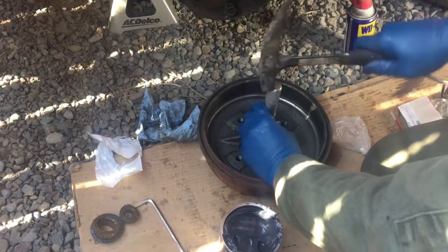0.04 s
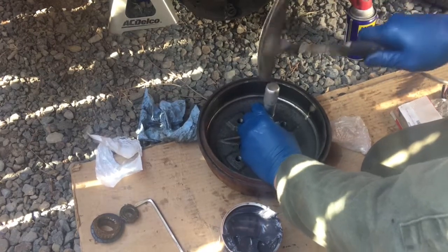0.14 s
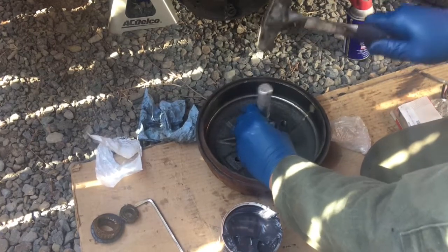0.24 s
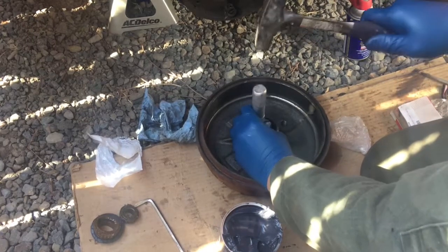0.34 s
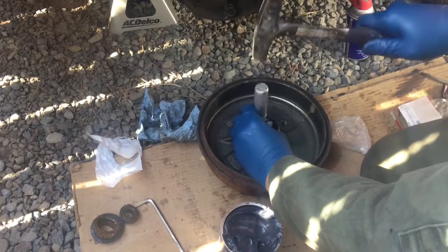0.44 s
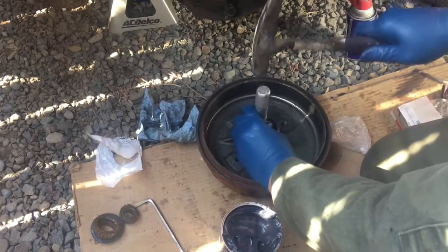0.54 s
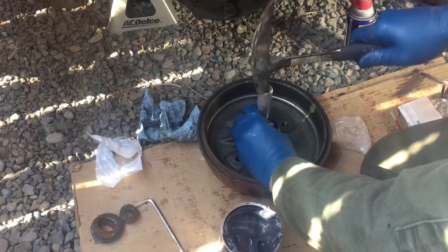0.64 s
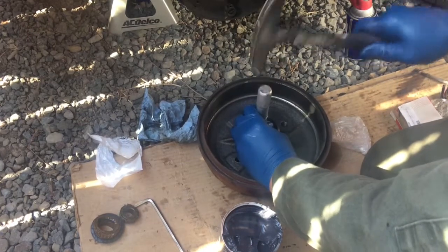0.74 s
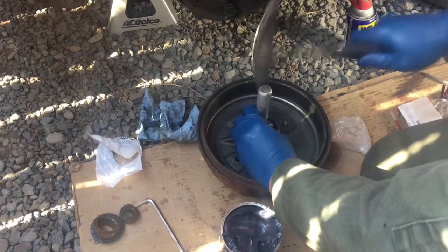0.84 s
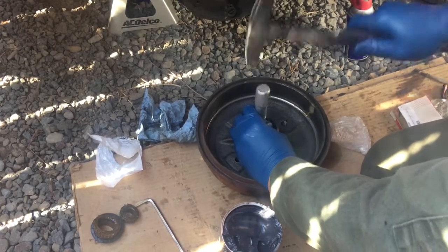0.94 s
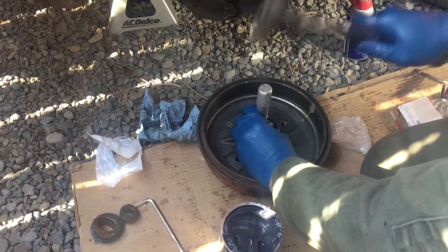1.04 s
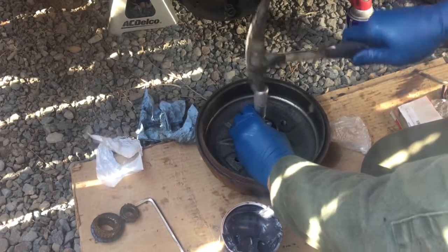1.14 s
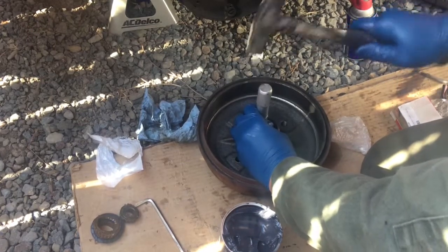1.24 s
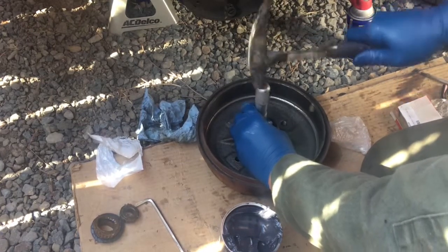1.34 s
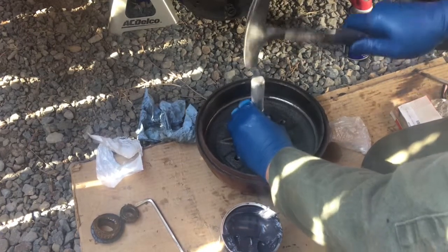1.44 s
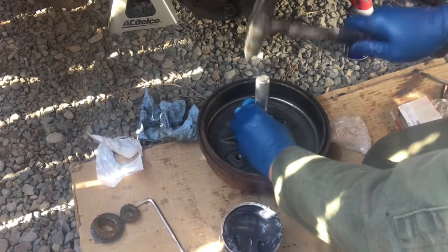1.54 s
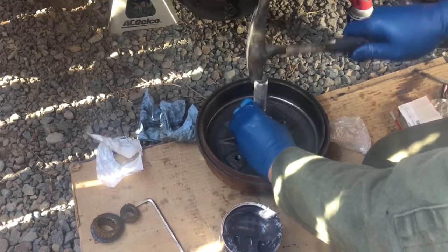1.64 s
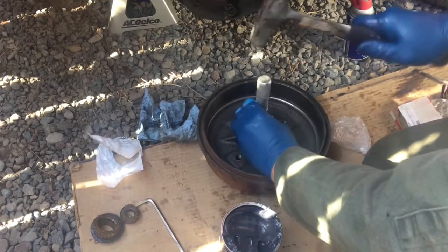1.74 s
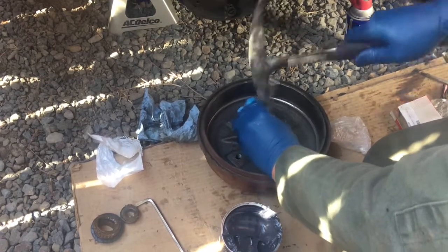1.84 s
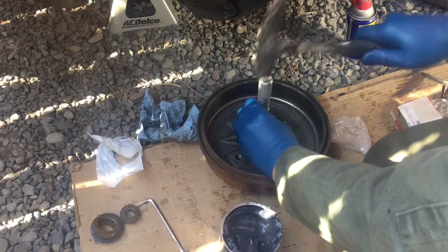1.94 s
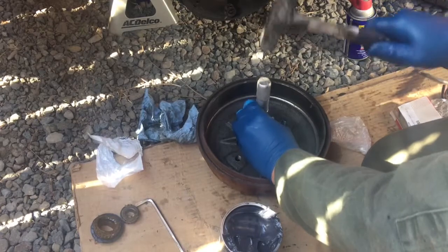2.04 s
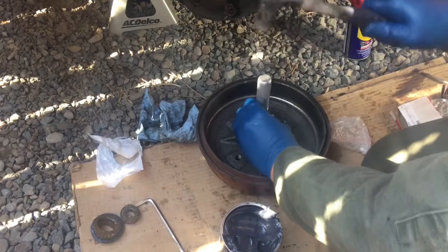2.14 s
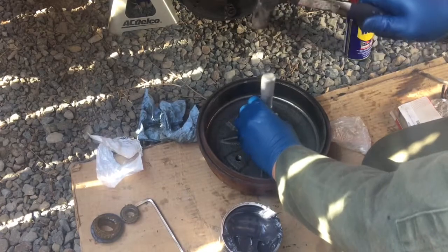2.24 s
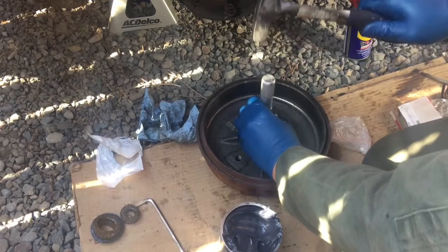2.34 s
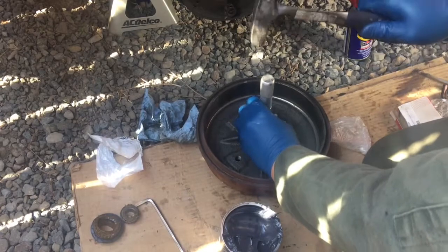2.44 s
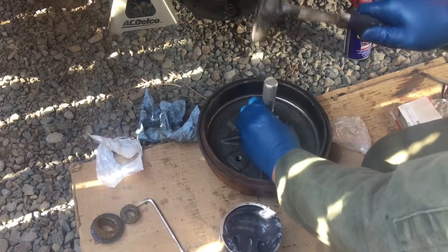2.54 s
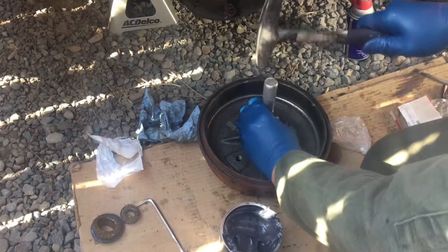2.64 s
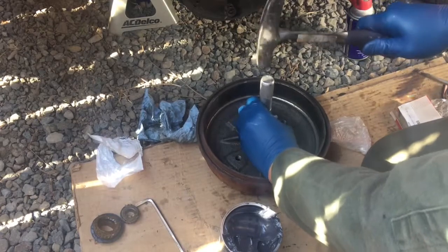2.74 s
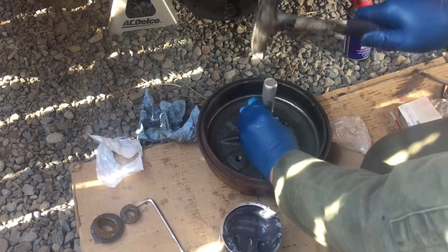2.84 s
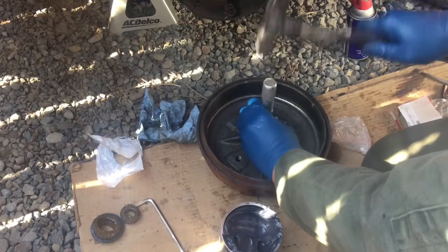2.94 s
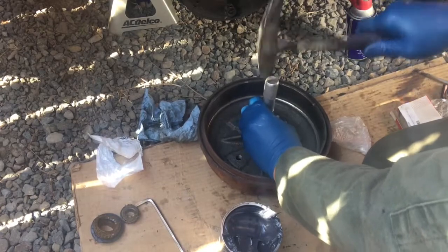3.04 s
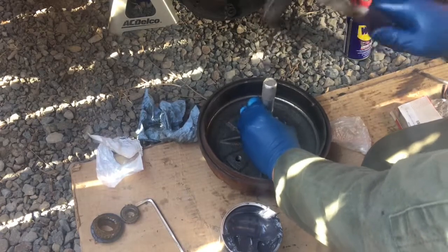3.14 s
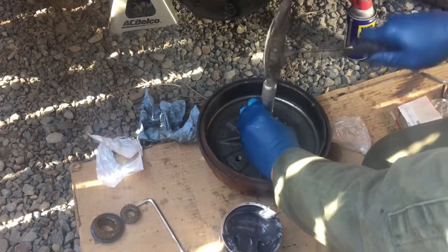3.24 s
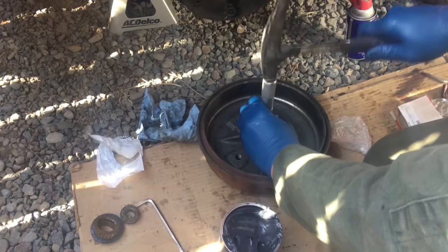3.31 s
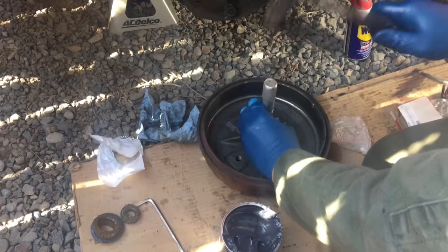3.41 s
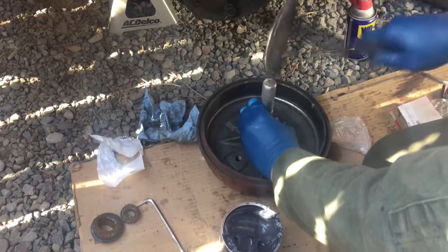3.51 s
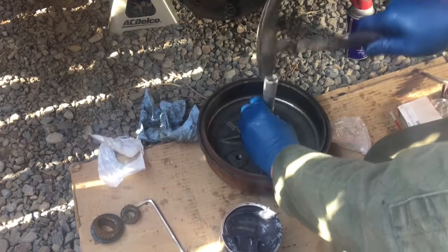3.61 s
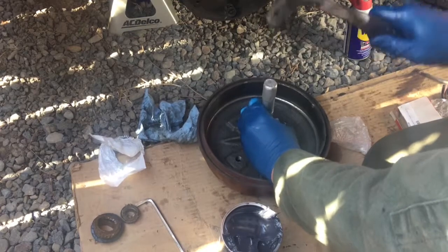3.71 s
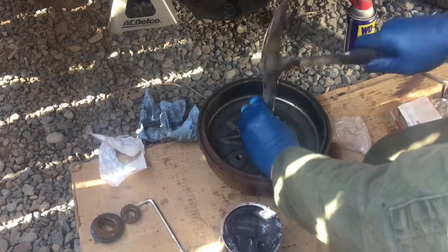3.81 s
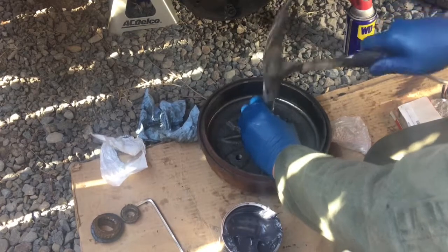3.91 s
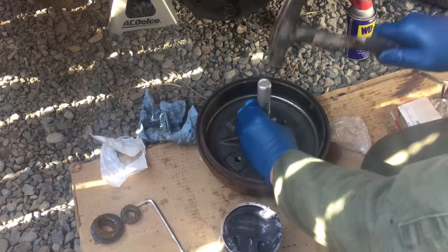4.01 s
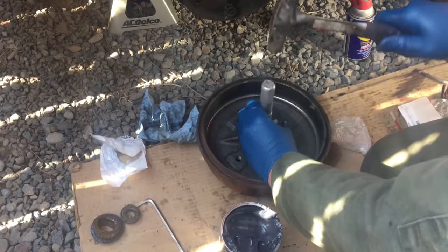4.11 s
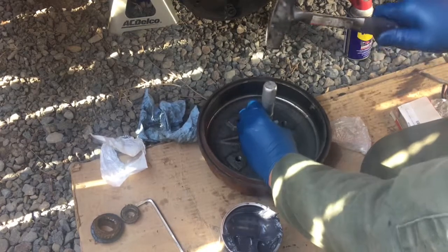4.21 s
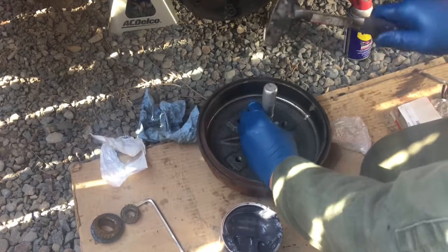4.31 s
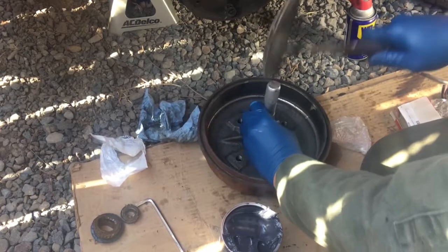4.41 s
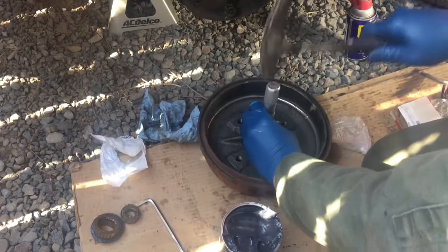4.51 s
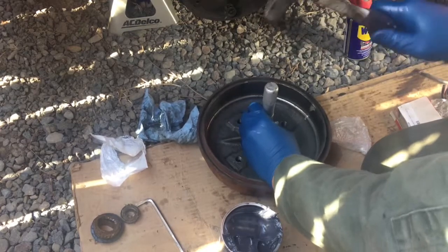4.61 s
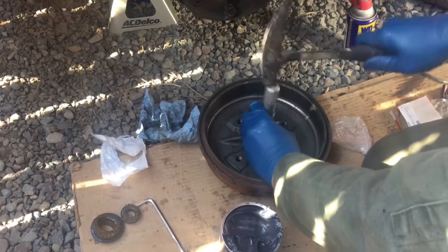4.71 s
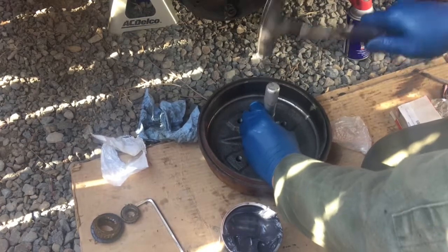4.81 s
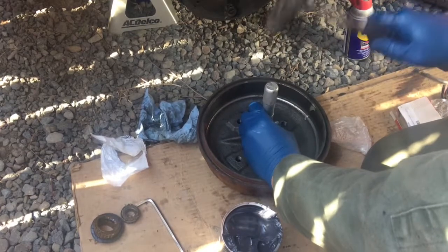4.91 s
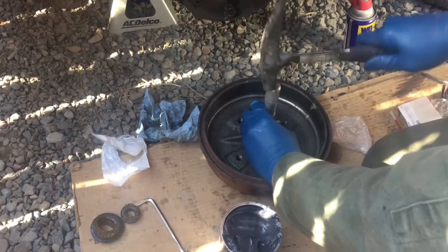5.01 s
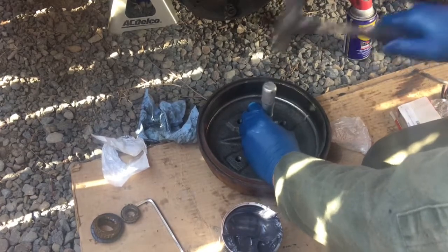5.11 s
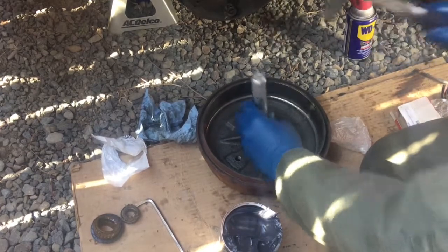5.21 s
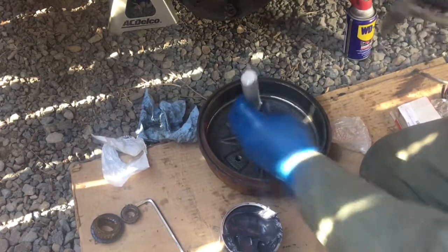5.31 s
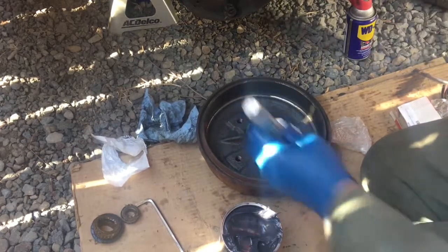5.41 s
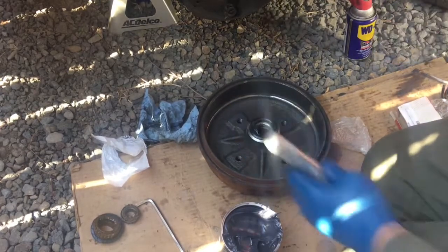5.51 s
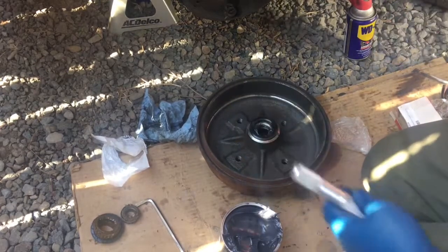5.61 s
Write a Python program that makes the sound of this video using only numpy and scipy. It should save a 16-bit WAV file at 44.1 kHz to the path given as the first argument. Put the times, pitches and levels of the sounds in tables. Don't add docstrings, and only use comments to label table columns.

```python
import sys
import numpy as np
from scipy import signal
from scipy.fft import rfft, irfft
from scipy.io import wavfile
from scipy.ndimage import uniform_filter1d

SR = 44100
rng = np.random.default_rng(int(sys.argv[2]) if len(sys.argv) > 2 else 0)


def wav_out(sig):
    wavfile.write(sys.argv[1], SR, np.round(np.clip(np.atleast_2d(sig).T, -1, 1) * 32767).astype(np.int16))


def natural_amplitude(level_db):
    exponent = np.asarray(level_db, float) / 20
    return 10 ** exponent


N = 249341

# t/s, force level/dB, contact/s, head ring lost by a glancing hit/dB, shank ring level/dB
BLOWS = [(0.0, -17.5, .001, -11, -41.5), (0.846, -19, .007, -19.5, -45), (1.079, -16, 0.0099, -16.5, -36),
         (1.333, -22, 0.0086, -23, -31.5), (1.586, -20.2, .005, -19.5, -42.5),
         (1.809, -19.5, 0.0048, -17.5, -41), (2.973, -21, .0049, -15, -41),
         (3.24, -16.5, .0063, -7.5, -26.5), (3.511, -16.5, 0.0068, 0.15, -35.5),
         (3.775, -14.5, 0.0064, -4.5, -34.5), (4.43, -20.5, .008, -16, -33.5),
         (4.691, -14.5, .0067, -0.55, -31.5), (4.955, -15.5, .0088, -1.7, -29)]
# thud f/Hz, thud level/dB, web shake/dB, lean from web to boss/dB,
# flange ring level/dB
STANCE = [(605, -18.5, -8.5, 2.5, -14.5), (574, -9.5, 2.5, -3.5, -13.5), (491.8, -9.5, 1, -6, -11.5),
          (511, -12.5, 5.5, 1, -11.5), (502, -6.5, -1.8, 1, -13.5), (566, -10, 0, 4.5, -14),
          (378.2, -12.5, -1.5, 5, -7.5), (395, -5, 4.5, 3.5, -7.5), (364, -8, 4.5, 4, -6.5),
          (362.4, -8, -2, -1.35, -6.5), (379, -12.5, 0.37, 9.5, -11), (387, -10, -4, -5.5, -10.5),
          (583, -7, -6, -7, -7.5)]
# oval swing level/dB, its axis/degrees, three-lobe level/dB
RIM = [(-45.5, 32, -57), (-53.5, 42, -60), (-49.5, 42, -65), (-54.5, 22, -56), (-55.5, 48, -55),
       (-56, 63, -52), (-63, 38, -52), (-57.5, 70, -56), (-55.5, 48, -54), (-59.5, 48, -56),
       (-64.5, 20, -63), (-49, 27, -54), (-49, 27, -56)]
# f/Hz, t60/s
TOOL = [(4802, .115), (5437, .18), (6112, .115), (7962, .09), (13280, .08)]
HEAD_DB = [-22.5, -21, -29.5, -33]
HEAD_PER_GLANCE = [1.05, 1.3, .9, .8]
HEAD_SEATED_DB = [-3, 0, 4.5, 0]
# f/Hz, t60/s, cluster width/Hz,
# cluster level/dB, cluster t60/s
HUB = [(1700, .07, 80, -22, .42), (2225, .09, 170, -4, .22), (2560, .08, 130, -5, .18),
       (3110, .09, 140, -7, .25), (3830, .16, 240, 15, .075)]
# level/dB, dB per dB of shake, dB per dB of lean
HUB_SHARE = [(-20.5, 1.16, -0.66), (-25, 0.7, -0.55), (-22, 0.97, -1.25), (-35, 0.9, 1.26)]
# f/Hz, t60/s, time after the blow at which its level holds/s
BELL = [
    (655, 3.4, .25),
    (678, 2.2, .2),
    (1535.5, 1.4, .19),
    (5879, .16, .07),
]
# f/Hz, level/dB per Hz
CRACK = [(60, -46), (120, -17.5), (500, -1), (1200, -10.5), (2100, -0.5), (3500, -6), (7000, -3.5),
         (10000, -11.5), (13000, -16), (16000, -23)]
# f/Hz, level/dB per Hz
CLATTER = [(40, -37.5), (80, -7.5), (600, -3.5), (1200, -7.5), (2200, -6.5), (3200, -8), (5000, -7),
           (7500, -6), (10500, -11.5), (13500, -13.5), (16000, -14)]
# f/Hz, t60/s
CLATTER_T60 = [(100, .3), (500, .33), (2000, .27), (4000, .23), (7000, .19), (11000, .16), (16000, .15)]
# f/Hz, t60/s
YARD_T60 = [(200, 2.9), (1500, 0.37), (4000, .6), (10000, 0.13)]
AIR, AIR_DB = [(15, -32), (30, -13), (65, 1), (110, -13.5), (170, -17), (300, -23.5), (700, -29),
               (1500, -33.5), (3000, -37.5), (6000, -41), (12000, -47.5), (16000, -48.5)], -53.5
# t/s, level/dB, t60/s, tilt/dB per octave, ring f/Hz
TAPS = [(.011, -19.5, .077, 9.5, 3900), (.623, -54.5, .074, 1, 3550), (0.682, -53, 0.055, 3, 2500),
        (.782, -58, .059, -0.5, 3600), (1.75, -52, .04, 2.5, 3530), (2.2025, -24, 0.029, 2.2, 6260),
        (2.206, -40.5, 0.16, 4, 7750), (3.172, -55, .03, 10, 7000), (3.537, -23, .12, -0.7, 4000),
        (4.103, -39, 0.028, 3.5, 5800), (4.325, -58, .056, -1, 3580), (4.985, -16, 0.061, -0.5, 3940),
        (5.153, -52, 0.027, 0, 6450), (5.446, -54, 0.025, 1, 8800), (5.534, -41, 0.042, 2, 6560),
        (5.611, -35, .15, 6.5, 8570), (5.635, -39, 0.26, 11, 4500)]
# f/Hz, level/dB, t60/s
TAP_RINGS = [(574, -37, 0.13), (1676, -33, 0.062), (2410, -26, 0.05), (3600, -36, 0.081), (4000, -28, 0.07)]
# t/s, f/Hz, level/dB, t60/s
KNOCKS = [
    (5.61, 129.4, -26.5, 0.086),
    (5.612, 303.7, -29.5, 0.12),
    (5.613, 420, -26.5, 0.053),
    (5.612, 744, -40, .04),
    (5.632, 179.5, -29, .08),
    (5.632, 617, -40, 0.057),
]
# t/s, length/s, bright level/dB, dull part above it/dB, peak at share of length
RUSTLE = [
    (0.101, 0.39, -71.5, 16.5, 0.34),
    (3.922, .17, -77.5, 17.5, .55),
    (4.13, 0.32, -79.5, 12, .7),
    (5.12, 0.65, -60, 4.5, 0.45),
    (5.602, .06, -54, 1, .6),
]
# t/s, length/s, first f/Hz, held f/Hz, level/dB
BIRD = [
    (2.35, .08, 4400, 3500, -72),
    (2.525, .125, 4200, 3720, -68),
    (2.678, .087, 3500, 3100, -58),
    (2.786, .062, 3400, 2200, -62),
    (2.91, .035, 4100, 4500, -72),
]

MEAN_FORCE_DB = -17.5
SEATED_S = 4.4


def evened(x):
    return x / np.sqrt(np.mean(x ** 2) + 1e-20)


def smoothed(noise, width):
    return evened(uniform_filter1d(uniform_filter1d(noise, width), width))


def read(points, hz):
    f, value = np.transpose(points)
    return np.interp(np.log(hz + 1), np.log(f + 1), value)


def add(mix, s, sound):
    part = mix[round(s * SR):][:len(sound)]
    part += sound[:len(part)]


def coloured(noise, gain_db):
    hz = np.fft.rfftfreq(len(noise), 1 / SR)
    return evened(irfft(rfft(noise) * natural_amplitude(gain_db(hz)), len(noise)))


def around(noise, hz, width):
    return coloured(noise, lambda f: -20 * np.log10(1 + ((f - hz) / width) ** 2))


def fading(noise, t60):
    hz, t, z = signal.stft(noise, SR, nperseg=256)
    decay = natural_amplitude(-60 * t / read(t60, hz)[:, None])
    return signal.istft(z * decay, SR, nperseg=256)[1][:len(noise)]


def ring(hz, db, t60, size, phase=0):
    t = np.arange(size) / SR
    return natural_amplitude(db - 60 * t / t60) * np.sin(2 * np.pi * hz * t + phase)


def crack(t, force_db, contact, glance_db, lean_db):
    tilt = 0.062 * lean_db
    level_db = 2.5 + 0.12 * (force_db - MEAN_FORCE_DB) - 7.5
    t60 = max(0.086 + 0.024 * glance_db, .01)
    noise = rng.standard_normal(len(t))
    sound = coloured(noise, lambda f: read(CRACK, f) + tilt * np.log2(f + 200))
    return natural_amplitude(level_db - 60 * np.maximum(t - contact, 0) / t60) * sound


def clatter(force_db, dense):
    noise = rng.standard_normal(len(dense) * 2 - 2)
    sound = coloured(noise, lambda f: read(CLATTER, f) + 0.35 * np.log2(f + 200) + 3 * dense)
    return natural_amplitude(force_db) * fading(sound, CLATTER_T60)


def yard(force_db, size):
    sound = coloured(rng.standard_normal(size), lambda f: read(CLATTER, f))
    return natural_amplitude(force_db - 31) * fading(sound, YARD_T60)


def thud(t, hz, db):
    pair = ring(hz, db, 0.067, len(t)) + ring(965 - hz, db - 10, 0.075, len(t))
    return pair * np.minimum(t / 0.0046, 1)


def boom(t, force_db):
    sound = coloured(rng.standard_normal(len(t)), lambda f: -7.5 * np.log2((f + 1) / 170) ** 2)
    return natural_amplitude(force_db - 7 - 60 * t / 0.14) * sound


def tool_rings(t, seated, glance_db, shank_db):
    head_db = HEAD_DB + np.multiply(HEAD_PER_GLANCE, glance_db) + np.multiply(HEAD_SEATED_DB, seated)
    out, noise = np.zeros(len(t)), rng.standard_normal(len(t))
    for (hz, t60), db in zip(TOOL, np.insert(head_db, 3, shank_db)):
        start_db = db - .5 + 60 * .04 / t60
        mode = ring(hz, start_db, t60, len(t), rng.uniform(0, 2 * np.pi))
        out += mode * np.minimum(t / .007, 1)
        out += natural_amplitude(db - 13 - 60 * (t - .04) / (.11 + t60 / 2)) * around(noise, hz, 25)
    return out


def hub_rings(t, shake_db, lean_db, flange_db):
    out = np.zeros(len(t))
    levels = [flange_db, *(np.array(HUB_SHARE) @ [1, shake_db, lean_db])]
    for (hz, t60, width, cluster_db, linger), db in zip(HUB, levels):
        out += ring(hz, db + 4, t60, len(t), rng.uniform(0, 2 * np.pi))
        cluster = around(rng.standard_normal(len(t)), hz, width)
        out += natural_amplitude(db + cluster_db - 60 * t / linger) * cluster
    return out


def bell(s, size, oval_db, axis_deg, lobes_db):
    turn = np.radians(axis_deg)
    lip_db = oval_db - 3 + 12 * (s > SEATED_S)
    levels = [oval_db + 20 * np.log10(np.cos(turn)), oval_db + 20 * np.log10(np.sin(turn)), lobes_db, lip_db]
    return sum(ring(hz, db + 60 * at / t60, t60, size) for (hz, t60, at), db in zip(BELL, levels))


def blows():
    out, t = np.zeros(N), np.arange(SR) / SR
    dense = smoothed(rng.standard_normal(SR // 2 + 1), 40)
    edges = np.minimum(t / .0005, 1) * np.minimum((1 - t) / .1, 1)
    stops = [row[0] for row in BLOWS[1:]] + [N / SR]
    for blow, stance, rim, stop in zip(BLOWS, STANCE, RIM, stops):
        s, force_db, contact, glance_db, shank_db = blow
        thud_hz, thud_db, shake_db, lean_db, flange_db = stance
        hit = crack(t, force_db, contact, glance_db, lean_db)
        hit += clatter(force_db, dense)
        hit += yard(force_db, len(t))
        hit += thud(t, thud_hz, thud_db)
        hit += boom(t, force_db)
        hit += tool_rings(t, s > SEATED_S, glance_db, shank_db)
        hit += hub_rings(t, shake_db, lean_db, flange_db)
        add(out, s, hit * edges)
        add(out, s + .003, bell(s, round((stop - s + .005) * SR), *rim))
    return out


def air():
    swell = smoothed(rng.standard_normal(N), 6000)
    return natural_amplitude(AIR_DB + 0.4 * swell) * coloured(rng.standard_normal(N), lambda f: read(AIR, f))


def taps():
    out, size = np.zeros(N), SR // 4
    t = np.arange(size) / SR
    for s, db, t60, tilt_db, hz in TAPS:
        noise = rng.standard_normal(size)
        tick = coloured(noise, lambda f: tilt_db * np.log2(np.clip(f, 100, 7000)) - 0.0018 * f)
        tap = natural_amplitude(db - 60 * t / t60) * tick + ring(hz, db + .3, t60 / 2, size)
        add(out, s, tap * np.minimum(t / 0.00084, 1))
    firmest_s = TAPS[5][0]
    add(out, firmest_s, sum(ring(*mode, size) for mode in TAP_RINGS))
    for s, *mode in KNOCKS:
        add(out, s, -ring(*mode, size))
    return out


def rustle():
    out = np.zeros(N)
    for s, length, db, dull_db, peak in RUSTLE:
        t = np.arange(0, length, 1 / SR)
        noise = rng.standard_normal((3, len(t)))
        grain = natural_amplitude(1.7 * evened(uniform_filter1d(noise[2], 150)))
        bright = coloured(noise[0], lambda f: -4 * np.log2((f + 1) / 5500) ** 2)
        dull = coloured(noise[1], lambda f: -12 * np.log2((f + 1) / 1300) ** 2 / 3.45)
        stroke_db = db + np.interp(t / length, [0, np.clip(peak, .05, .95), 1], [-6.5, 0, -6.5])
        cloth = grain * (bright + natural_amplitude(dull_db) * dull)
        add(out, s, natural_amplitude(stroke_db) * cloth * signal.windows.tukey(len(t), .1))
    return out


def bird():
    out = np.zeros(N)
    for s, length, first_hz, held_hz, db in BIRD:
        t = np.arange(0, length, 1 / SR)
        slide = abs(held_hz - first_hz) / 20000
        waver = 1 + .02 * evened(uniform_filter1d(rng.standard_normal(len(t)), 150))
        hz = np.interp(t, [0, slide], [first_hz, held_hz]) * waver
        level_db = db + np.interp(t, [0, slide], [-2, 0]) - 170 * np.maximum(t - slide, 0)
        note = natural_amplitude(level_db) * np.sin(2 * np.pi * np.cumsum(hz) / SR)
        add(out, s, note * signal.windows.tukey(len(t), .3))
    tail = rng.standard_normal(6000) * natural_amplitude(-60 * np.arange(6000) / SR / .25)
    return out + natural_amplitude(-4) * signal.oaconvolve(out, tail / np.linalg.norm(tail))[:N]


def scene():
    return (blows() + air() + taps() + rustle() + bird())[None]


def band_limit(x):
    return signal.sosfilt(signal.butter(12, 16360, fs=SR, output="sos"), x)


def record(dry):
    low = signal.firwin(255, 15550, fs=SR)
    loud = np.clip(signal.oaconvolve(dry, low[None], "same"), -.96, .96)
    lag = np.arange(-1500, 1501) / SR
    window = np.exp(-abs(lag) / .005)
    notch = 2 * window * np.cos(2 * np.pi * 3120 * lag) / window.sum()
    loud = loud - .5 * signal.oaconvolve(loud, notch[None], "same")
    bright = signal.sosfilt(signal.butter(2, 1500, "high", fs=SR, output="sos"), loud[0])
    ahead = np.arange(1024)
    for s, force_db, *_ in BLOWS[1:]:
        ghost_db = force_db - 21.5 - 14 * np.sqrt(ahead / len(ahead)) + 8
        add(loud[0], s - len(ahead) / SR, natural_amplitude(ghost_db) * bright[round(s * SR) + ahead])
    edge = signal.firwin(255, 16250, window=("kaiser", 8), fs=SR)
    return band_limit(signal.oaconvolve(loud, edge[None], "same"))


dry = scene()
out = record(dry)
wav_out(out)
```